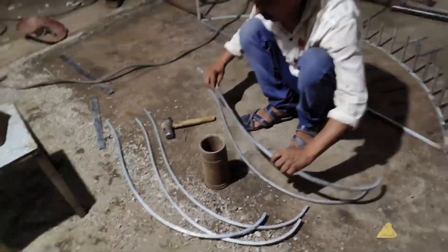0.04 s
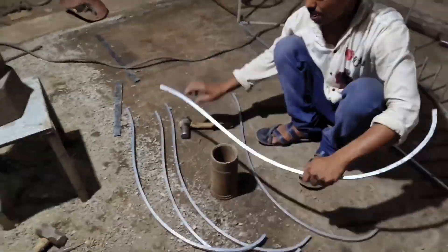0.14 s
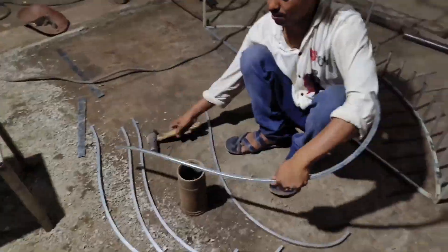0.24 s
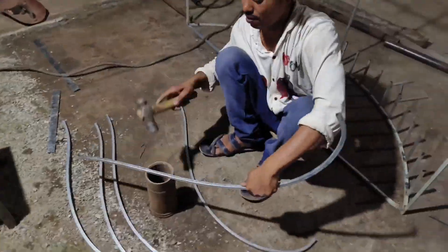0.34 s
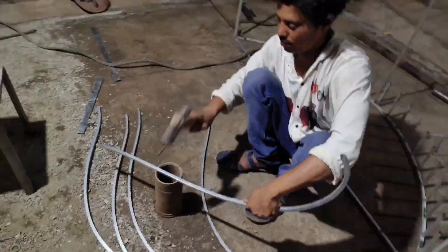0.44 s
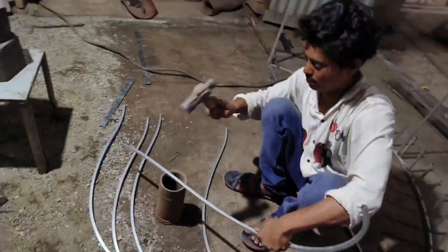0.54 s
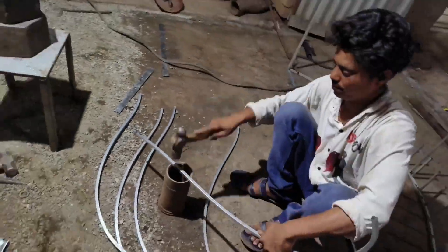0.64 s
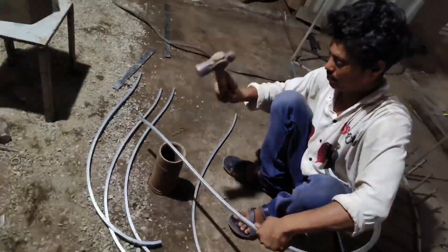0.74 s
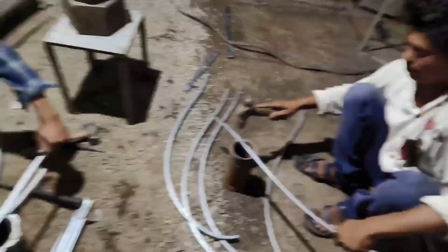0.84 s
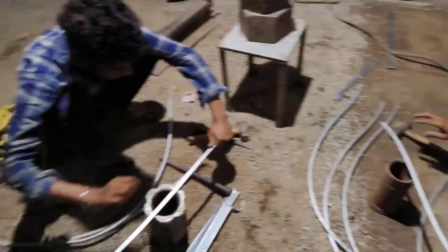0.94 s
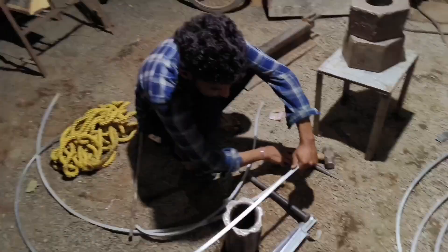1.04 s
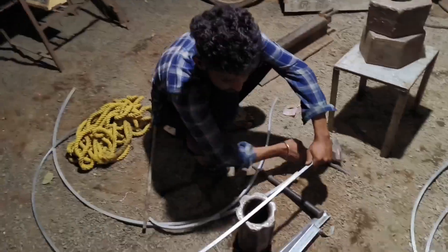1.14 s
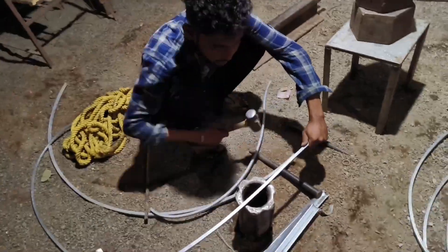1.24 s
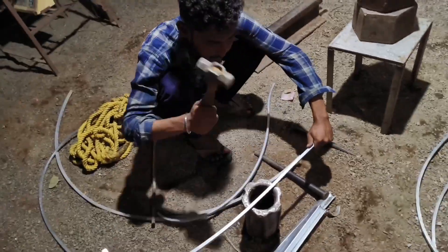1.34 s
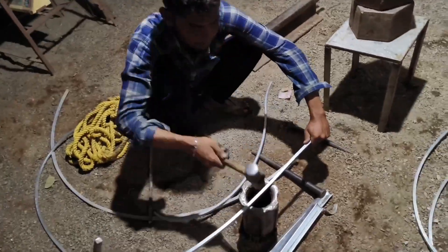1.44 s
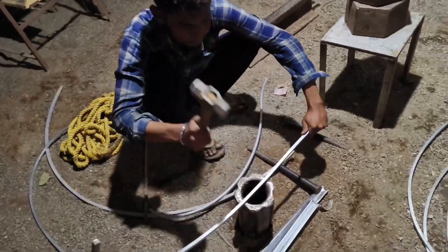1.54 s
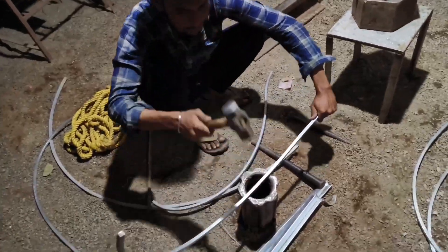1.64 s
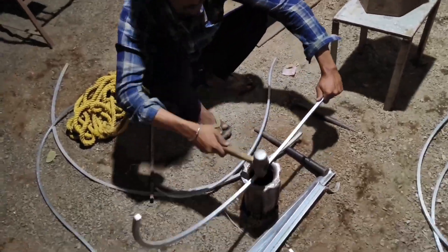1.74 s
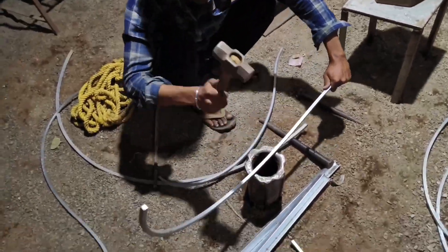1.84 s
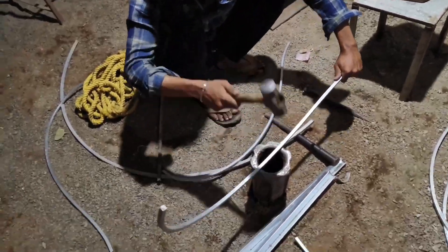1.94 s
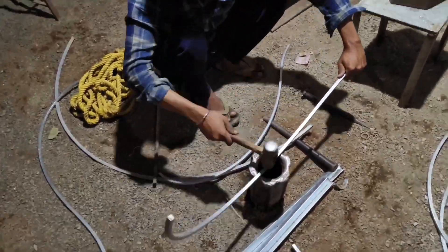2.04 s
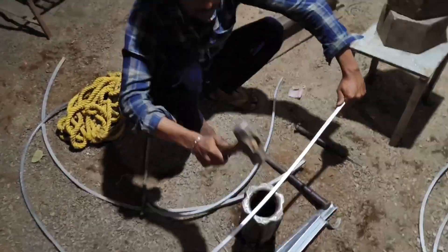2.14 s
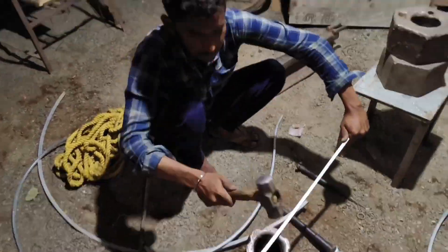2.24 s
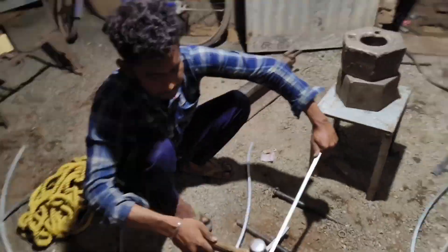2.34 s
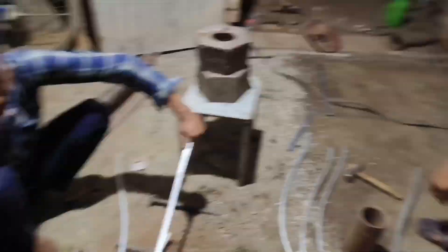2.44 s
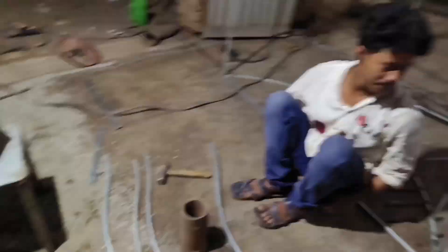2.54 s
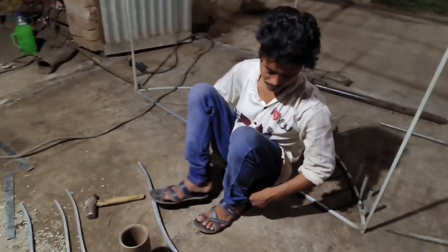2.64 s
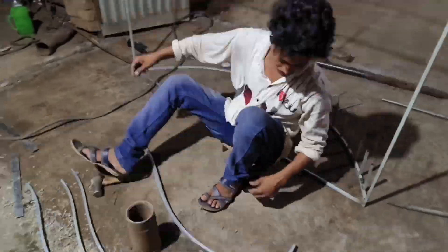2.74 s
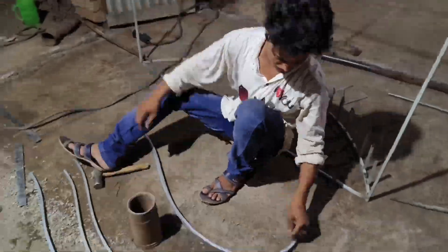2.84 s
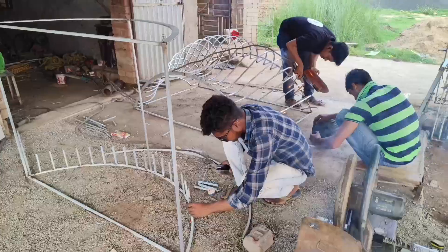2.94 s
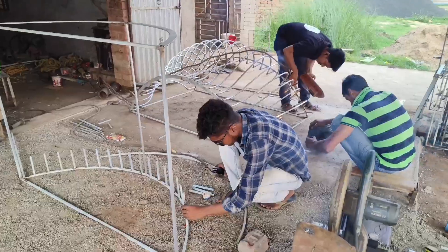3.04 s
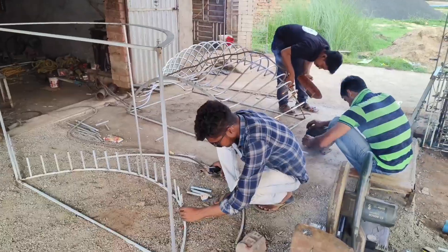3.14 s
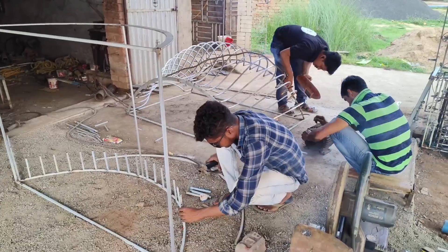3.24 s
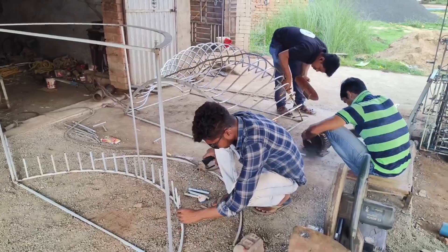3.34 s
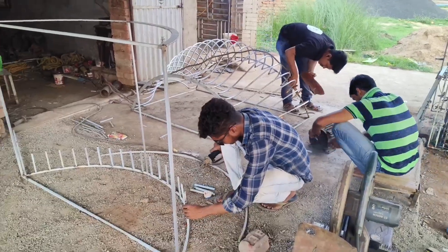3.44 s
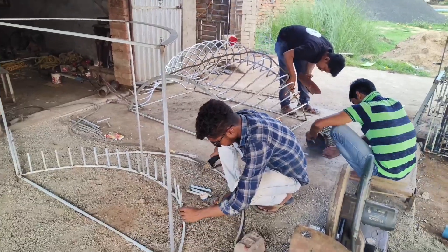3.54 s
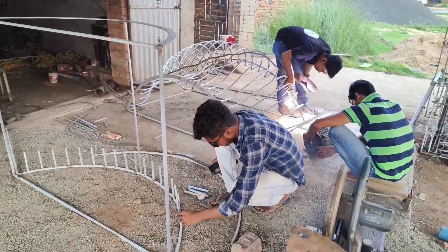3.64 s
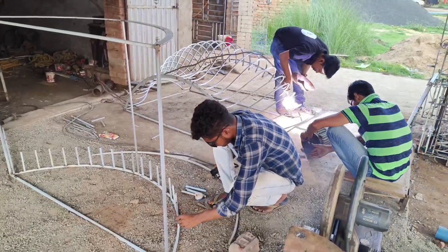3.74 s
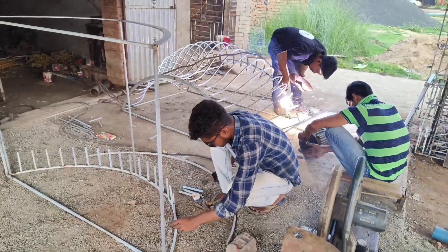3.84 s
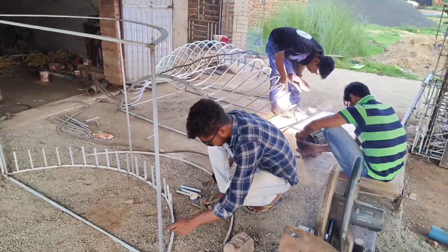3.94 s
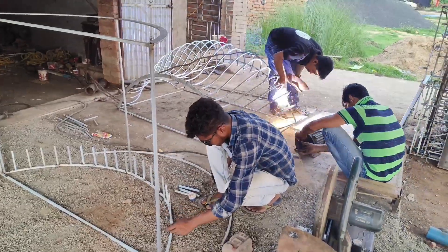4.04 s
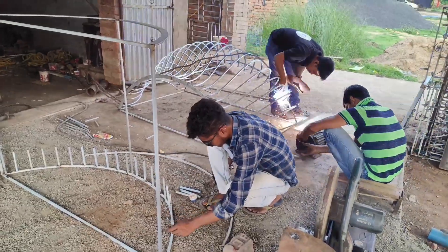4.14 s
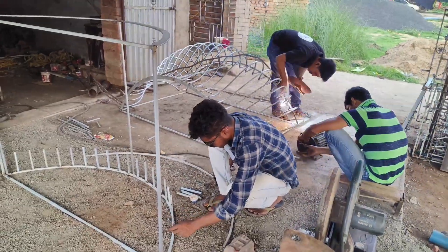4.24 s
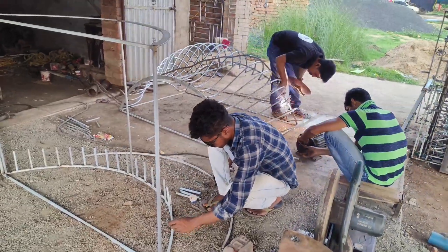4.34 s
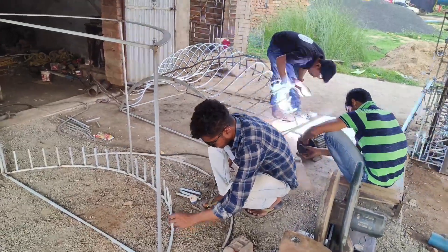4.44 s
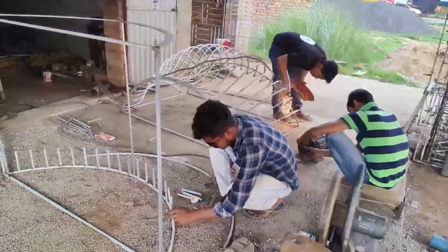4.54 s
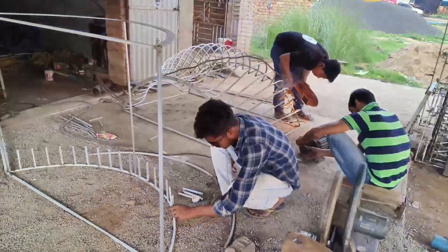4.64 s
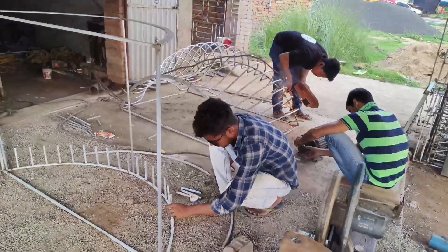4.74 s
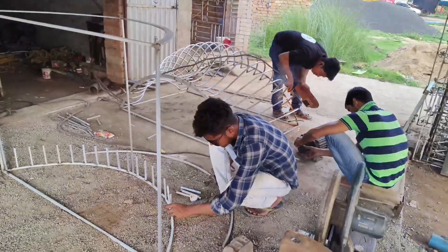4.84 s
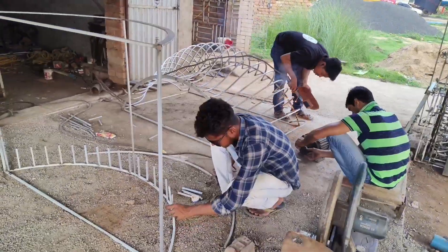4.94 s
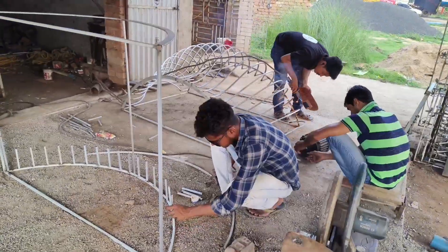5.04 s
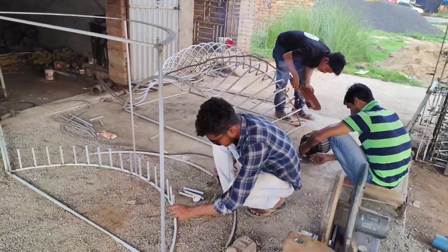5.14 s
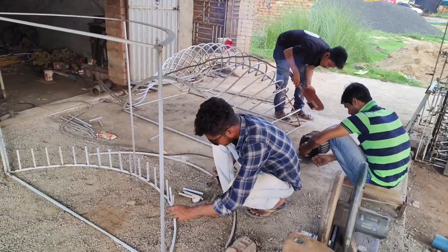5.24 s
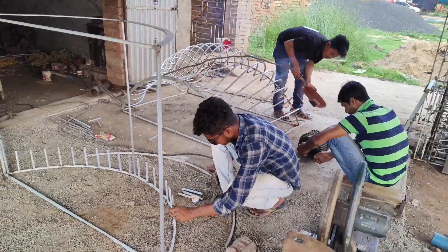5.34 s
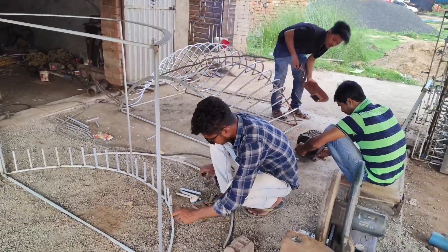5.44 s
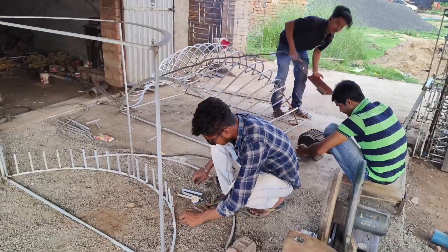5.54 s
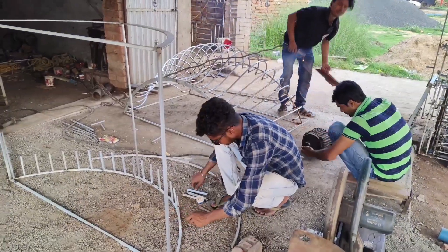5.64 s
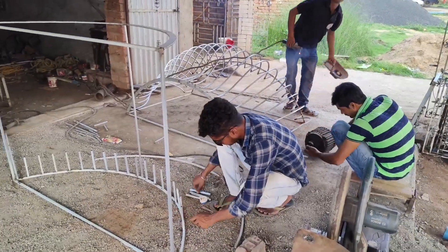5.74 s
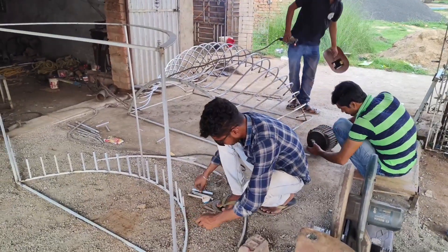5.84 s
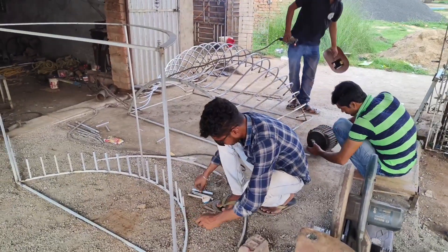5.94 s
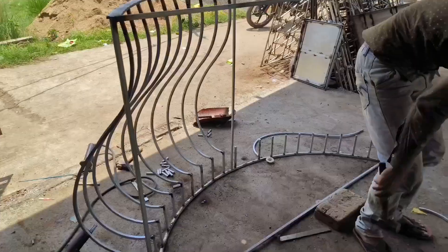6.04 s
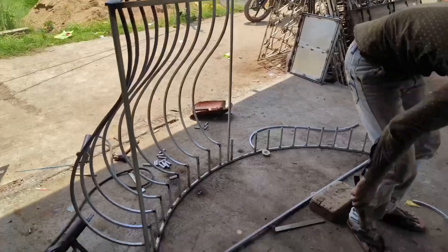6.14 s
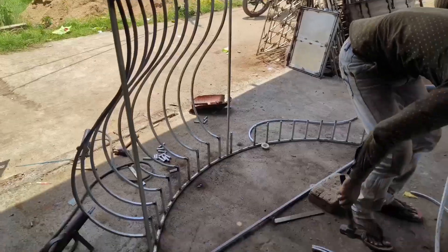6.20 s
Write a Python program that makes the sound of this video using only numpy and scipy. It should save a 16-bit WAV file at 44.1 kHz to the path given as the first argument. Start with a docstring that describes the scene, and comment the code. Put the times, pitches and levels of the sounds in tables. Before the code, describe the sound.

Fast, sharp hammering on steel rods in a metalwork yard, then a quieter machine hum with a short burst of hissing, spitting welding.

```python
"""Thin steel rods drag over gritty ground and clink, while two workers hammer them on hollow pipe anvils.
Each blow is a noise crack with a rattle; on the near anvil, pipe and rod ring in beating pairs of modes.
After a silent gap, machines drone in the metal yard and a welding arc hisses, spitting as molten drops
short it. A second gap, then a very brief last scrape."""
import sys
import numpy as np
from scipy import signal
from scipy.io import wavfile

SR = 44100
rng = np.random.default_rng(int(sys.argv[2]) if len(sys.argv) > 2 else 0)


def inscribe(sig):
    """Save sig as 16-bit PCM at rate SR to the path in sys.argv[1].

    A 1-D sig is mono; a 2-D sig holds one channel per row.
    Samples are clipped to [-1, 1] before scaling.
    """
    pcm = np.round(np.clip(np.atleast_2d(sig).T, -1, 1) * 32767)
    wavfile.write(sys.argv[1], SR, pcm.astype(np.int16))


N = 276507


def from_db(db):
    """dB to gain."""
    return 10 ** (np.asarray(db) / 20)


def rms_one(x):
    """Scale to rms 1."""
    return x / np.sqrt(np.mean(x ** 2) + 1e-20)


def sides(left_right_db):
    """Left and right gains."""
    return from_db(left_right_db / 2 * np.array([[1], [-1]]))


def padded(x, start):
    """Place a stereo sound at a start sample in the full length."""
    out = np.zeros((2, N))
    out[:, start:start + x.shape[1]] = x[:, :N - start]
    return out


def at_hz(points, hz):
    """Read a curve on a log-frequency axis."""
    points_hz, values = np.transpose(points)
    return np.interp(np.log(hz), np.log(points_hz), values)


def drift(rate_hz, size):
    """Slow random wander, rms about 1."""
    step, run_in = 40, 2000
    r = np.exp(-2 * np.pi * rate_hz * step / SR)
    white = rng.standard_normal(size // step + run_in + 2)
    slow = signal.lfilter([1], [1, -2 * r, r * r], white)[run_in:]
    return np.interp(np.arange(size) / step, np.arange(len(slow)), rms_one(slow))


def clicks(times_s, gains, size=N):
    """Train of single-sample impulses."""
    train = np.full(size, 1e-18)
    train[np.round(np.asarray(times_s) * SR).astype(int)] = gains
    return train


def random_clicks(per_s):
    """Impulses at random times, mean height 1."""
    return (rng.random(N) < per_s / SR) * rng.exponential(1, N) + 1e-18


def dying(train, t60_s, rise_s):
    """Envelope that rises at each click and decays."""
    fall, rise = from_db(-60 / (t60_s * SR)), np.exp(-1 / (rise_s * SR))
    return signal.lfilter([1 - rise], [1, -rise], signal.lfilter([1], [1, -fall], train))


def ring(train, hz, t60_s):
    """One mode: a unit click starts a decaying sine of height 1."""
    r, w = from_db(-60 / (t60_s * SR)), 2 * np.pi * hz / SR
    return signal.lfilter([0, np.sin(w)], [1, -2 * r * np.cos(w), r * r], train)


def bands(correlation, low_hz, top_hz, size):
    """Yield (centre Hz, stereo noise) in third octaves."""
    edges = 25 * 2 ** np.arange(0, 9.5, 1 / 3)
    white = rng.standard_normal((2, 2, size + SR // 10))   # adjacent bands get independent noise
    for k, (low, high) in enumerate(zip(edges, edges[1:])):
        if high > low_hz and low < top_hz:
            centre_hz = np.sqrt(low * high)
            bandpass = signal.butter(3, [low, high], "band", fs=SR, output="sos")
            mid, side = signal.sosfilt(bandpass, white[k % 2])[:, -size:]
            alike = np.clip(at_hz(correlation, centre_hz), -1, 1)
            yield centre_hz, np.sqrt(1 + alike) * mid + np.sqrt(1 - alike) * side * [[1], [-1]]


def coloured(spectrum, correlation, balance, flicker_db, flicker_hz, span):
    """Shaped noise whose bands flicker partly together; rms 1 within its span of samples."""
    size = span[1] - span[0]
    out, together = 0, drift(flicker_hz, size)
    for hz, noise in bands(correlation, spectrum[0][0], spectrum[-1][0], size):
        wander_db = flicker_db * (together + 1.62 * drift(flicker_hz, size))
        out = out + sides(at_hz(balance, hz)) * noise * from_db(at_hz(spectrum, hz) + wander_db)
    return padded(rms_one(out), span[0])


def narrow(hz, width_hz, correlation, size):
    """Stereo noise twice through one resonance; rms 1."""
    r = np.exp(-np.pi * width_hz / SR)
    mid, side = rng.standard_normal((2, size))
    x = mid + np.sqrt((1 - correlation) / (1 + correlation)) * side * [[1], [-1]]
    for _ in range(2):
        x = signal.lfilter([1, 0, -1], [1, -2 * r * np.cos(2 * np.pi * hz / SR), r * r], x)
    return rms_one(x)


# Ground noise. Each row: time in seconds, rumble in dB, grit in dB.
GROUND_LEVELS = [(0, -36.5, -40), (.15, -33.5, -41), (.5, -37, -39), (.68, -44, -43), (1, -48.5, -50),
                 (1.45, -46, -49.5), (1.7, -48.5, -52), (2.2, -54.5, -51), (2.72, -54, -53.5),
                 (2.91, -47.5, -52.5)]
# Spectra. Each row: frequency in Hz, relative density in dB.
RUMBLE_SPECTRUM = [(15, -38), (25, -9), (119, 1), (189, -4.5), (375, -4), (415, -10), (452, -14.5),
                   (626, -14), (1500, -30), (1950, -60), (3300, -120)]
SCRAPE_SPECTRUM = [(290, -31.5), (500, -1), (710, -11.5), (911, -1.5), (1370, -8), (1610, -6), (2730, -4),
                   (3880, -16), (4830, -10.5), (7170, -12), (10500, -38.5), (14000, -30.5), (16500, -58)]
# Each row: frequency in Hz, left-right correlation.
GROUND_CORRELATION = [(60, 1), (110, 0.94), (200, 0.95), (380, 0.63), (700, -0.29), (1290, -0.48),
                      (2380, 0.1), (4400, 0.19), (8120, -0.47), (15000, 0.32)]
# Each row: frequency in Hz, left over right in dB.
GROUND_BALANCE = [(60, 0.5), (180, 1.5), (550, -1), (1650, -2.5), (4970, -7.5), (15000, 1)]
# Rods and soles on grit. Each row: start in seconds, level in dB, T60 in seconds.
DRAGS = [(0.04, -33, 0.054), (0.213, -34.5, 0.22), (0.375, -28, 0.056), (0.469, -23.5, 0.19),
         (0.515, -28.5, 0.1), (.615, -52, .39), (1.127, -37, 0.21), (1.159, -41, 0.05),
         (1.211, -36.5, 0.083), (1.312, -40.5, .3), (1.391, -42, 0.95), (2.77, -50, 0.45),
         (5.741, -43, 0.18), (5.985, -43, 0.46), (6.013, -37.5, 0.043)]


def dragging():
    """Dragged rods rumble; a gritty scrape flares with each drag."""
    t = np.arange(N) / SR
    times_s, *levels_db = np.transpose(GROUND_LEVELS)
    rumble_gain, grit_gain = (from_db(np.interp(t, times_s, db, right=-140)) for db in levels_db)
    stereo = GROUND_CORRELATION, GROUND_BALANCE
    rumble = coloured(RUMBLE_SPECTRUM, *stereo, flicker_db=2, flicker_hz=4.2, span=(0, HAMMER_END))
    scrape = coloured(SCRAPE_SPECTRUM, *stereo, flicker_db=2.5, flicker_hz=13, span=(0, N))
    drags = sum(dying(clicks([s], from_db(db)), t60_s, rise_s=.0085) for s, db, t60_s in DRAGS)
    stones = dying(random_clicks(per_s=250), t60_s=.012, rise_s=.0006)   # single stones catch and slip
    return rumble_gain * rumble + (grit_gain + drags * (.8 + .35 * stones)) * scrape


# Metal clinks; the 700 Hz row is a shoe squeak. Each row: start in seconds, frequency in Hz, level in dB.
BRIEF_TONES = [(.272, 3400, -27), (.48, 950, -35), (.632, 4300, -31), (1.155, 1000, -34),
               (1.232, 2800, -22), (1.232, 4700, -34), (1.399, 5400, -35), (1.415, 1850, -35),
               (1.445, 2650, -42), (1.61, 1800, -42), (2.812, 700, -45), (3.82, 4200, -38)]


def clinks_and_squeak():
    """Brief narrow-band tones, shorter when higher: metal clinks and the squeak of a scuffing shoe."""
    out, size = 0, SR // 4
    for start_s, hz, db in BRIEF_TONES:
        envelope = dying(clicks([0], from_db(db), size), t60_s=.1 * (1000 / hz) ** .6, rise_s=.003)
        band = narrow(hz, width_hz=hz / 16, correlation=.2, size=size)
        out = out + padded(band * envelope, round(start_s * SR))
    return out


# Rods knocked and dropped. Each row: start in seconds, then in dB: level, left over right,
# thud, knock and treble offsets.
ROD_KNOCKS = [(.273, -4.5, -0.5, -9.5, -13, -14.5), (0.3157, -12, -1, -5, -10.5, -22.5),
              (.33, -21, 1, -1, -6, -27.5), (1.0057, -49.5, -6, 26.5, 17, -8),
              (1.038, -34, 1, -11, 5.5, -26.5), (1.315, -35.5, 4, -2, 8, -14),
              (1.3977, -31.5, -4, -12, -9, -2)]
# Far anvil. Each row: start in seconds, then in dB: level, left over right, thud and treble offsets.
FAR_BLOWS = [(0.5618, -10.5, -7, -1.5, -1), (0.7244, -10, -5, -0.5, -2), (.8888, -6.5, -3, -8, -1)]
# Near anvil. Each row: as the far anvil, then ring levels in dB: hollow, pipe, low rod, high rod.
NEAR_BLOWS = [(1.5175, -7.5, -2.5, -5.5, -3, -21, -33, -27, -25.5),
              (1.6817, -7.5, 4, -7, -1, -25.5, -27.5, -27.5, -24.5),
              (1.8387, -7.5, -0.5, -2.5, 0, -10.5, -37.5, -33, -28.5),
              (1.9922, -6.5, -3, -2.5, -2.5, -32, -33, -15.5, -30),
              (2.1402, -8.5, -3, -8.5, 2, -19, -34.5, -30.5, -26.5),
              (2.2771, -8.5, 0.5, -1.5, -1, -31, -27, -33, -14),
              (2.4086, -10, -4, -1.5, -2, -9.5, -29, -34.5, -26),
              (2.5359, -12, -4.5, -5.5, 7, -23.5, -30.5, -34.5, -19.5),
              (2.6344, -12.5, -1.5, -9.5, 0.5, -34, -32.5, -29.5, -23)]


def all_blows():
    """Knocks and hammer blows in time order, as the columns of ROD_KNOCKS."""
    hammer = [(*row[:4], 0, row[4]) for row in FAR_BLOWS + NEAR_BLOWS]
    return np.transpose(sorted(list(map(tuple, ROD_KNOCKS)) + hammer))


# Each row: frequency in Hz, relative density in dB.
CRACK_SPECTRUM = [(35, -16.5), (60, -10.5), (240, -2.5), (534, -2), (2090, -8.5), (2400, -10.5), (3420, -9),
                  (3750, -15.5), (4430, -8), (6760, -7.5), (10600, -17), (14700, -11), (16500, -28)]
# Each row: frequency in Hz, T60 in seconds.
CRACK_DECAY = [(80, 0.083), (500, 0.023), (3000, 0.036), (15000, 0.045)]
# Each row: frequency in Hz, rattle relative to crack in dB.
RATTLE_LEVELS = [(80, -20), (500, -24), (1500, -23), (4000, -17), (8000, -22), (10500, -30), (15000, -28)]
# Each row: frequency in Hz, left-right correlation.
CRACK_CORRELATION = [(60, 0.55), (110, 0.59), (200, 0.46), (380, 0.03), (700, -0.49), (1290, -0.25),
                     (2380, -0.0), (4400, 0.06), (8120, -0.14), (15000, 0.07)]
# Each row: frequency in Hz, left over right in dB.
CRACK_BALANCE = [(60, 7), (130, 0.5), (290, 3), (640, 5.5), (1410, 1.5), (3100, 5.5), (6820, -3),
                 (15000, 4.5)]
CRACK_GAIN_DB, CUTOFF_HZ = 4.5, 16700


def cracks():
    """Each impact is a noise burst: a short crack and a longer rattle, longest in the bass."""
    starts_s, level_db, pan_db, thud_db, knock_db, treble_db = all_blows()
    offsets_db, crossovers_hz = [thud_db, knock_db, 0, treble_db], [600, 2500, 9000]
    out = 0
    for hz, noise in bands(CRACK_CORRELATION, 60, CUTOFF_HZ, HAMMER_END):
        colour_db = offsets_db[np.searchsorted(crossovers_hz, hz)] + at_hz(CRACK_SPECTRUM, hz)
        train = clicks(starts_s, from_db(level_db + colour_db + CRACK_GAIN_DB), HAMMER_END)
        t60_s = at_hz(CRACK_DECAY, hz)
        crack = dying(train, t60_s, rise_s=.00051)
        rattle = from_db(at_hz(RATTLE_LEVELS, hz)) * dying(train, 3.1 * t60_s, rise_s=.0067)
        out = out + noise * (crack + rattle) * sides(at_hz(CRACK_BALANCE, hz))
    latest_blow = np.clip(np.searchsorted(starts_s, np.arange(HAMMER_END) / SR) - 1, 0, None)
    return out * sides(pan_db[latest_blow])


# Each row: frequency in Hz, level relative to the blow in dB, T60 in seconds.
FAINT_MODES = [(3262, -30, .045), (4748, -28, .06), (5986, -28, .05), (7354, -30, .045), (9184, -30, .045),
               (10630, -32, .04), (13280, -34, .04), (14110, -34, .045), (14800, -30, .045)]


def faint_rings():
    """Every impact wakes faint modes, with random strength and sign per mode and ear."""
    starts_s, blow_db = all_blows()[:2]
    out = np.zeros((2, HAMMER_END))
    for hz, mode_db, t60_s in FAINT_MODES:
        chance = rng.normal(0, 1, (len(starts_s), 2, 2))
        for side in range(2):
            scatter_db, sign = 3 * chance[:, side, 0], np.sign(chance[:, side, 1])
            gains = sign * from_db(blow_db + mode_db + scatter_db)
            out[side] += ring(clicks(starts_s, gains, HAMMER_END), hz, t60_s)
    return out


# Near anvil, rod and hammer head. Each row: frequency in Hz, T60 in seconds, left over right in dB,
# twin offset in Hz.
STRONG_MODES = [(370, .032, 5, 60), (2390, .21, -6, 14), (3835, .14, -3, 40), (4015, .075, -2, 30),
                (5285, .055, -8, 45), (6720, .048, -9, 60), (11580, .27, 4, 45)]
ROD_UPPER_OFFSET_DB, CLANK_DB, HEAD_DB = -2, -19, -44


def strong_rings():
    """Close pairs of modes beat; each near blow stops the last ring and starts a new one."""
    starts_s, *_, hollow_db, pipe_db, low_rod_db, high_rod_db = np.transpose(NEAR_BLOWS)
    levels_db = np.broadcast_arrays(hollow_db, pipe_db, low_rod_db, low_rod_db + ROD_UPPER_OFFSET_DB,
                                    high_rod_db, CLANK_DB, HEAD_DB)
    start = round(starts_s[0] * SR)
    t = np.arange(start, HAMMER_END) / SR
    latest_blow = np.clip(np.searchsorted(starts_s, t) - 1, 0, None)
    age_s = np.clip(t - starts_s[latest_blow], 0, None)
    out = 0
    for (hz, t60_s, pan_db, split_hz), level_db in zip(STRONG_MODES, levels_db):
        phase = rng.uniform(0, 2 * np.pi, (len(starts_s), 2, 2))[latest_blow].T
        mode = np.sin(2 * np.pi * hz * age_s + phase[0])
        twin = .45 * np.sin(2 * np.pi * (hz + split_hz) * age_s + phase[1])
        waver_db = 3.5 * drift(rate_hz=50, size=len(t))   # the held rod chatters
        envelope = from_db(level_db[latest_blow] - 60 * age_s / t60_s + waver_db)
        out = out + (mode + twin) * envelope * sides(pan_db)
    attack = 1 - np.exp(-age_s / .0015)
    return padded(out * attack, start)


# Each row: start in seconds, level in dB, upper edge in Hz, T60 in seconds.
BUMPS = [(2.805, -46, 1200, 0.22), (2.847, -39.5, 597, 0.084), (3.831, -39, 1810, 0.46),
         (4.69, -32, 280, 0.067)]


def bumps():
    """Dull mono bursts: a foot scuffs, the arc strikes and breaks."""
    out = 0
    for start_s, db, top_hz, t60_s in BUMPS:
        bandpass = signal.butter(2, [70, top_hz], "band", fs=SR, output="sos")
        dull = rms_one(signal.sosfilt(bandpass, rng.standard_normal(N)))
        out = out + dull * dying(clicks([start_s], from_db(db)), t60_s, rise_s=.013)
    return out


# Each row: time in seconds, level in dB.
DRONE_LEVELS = [(3.22, -46.5), (3.46, -39.5), (3.88, -40.5), (4.0, -46), (4.6, -46.5), (5.2, -48.5),
                (5.36, -42), (5.55, -45), (5.8, -39.5), (6.06, -43)]
# Each row: frequency in Hz, width in Hz, full level in dB, its start and end in seconds.
WHINES = [(266.1, 10.7, -57.5, 3.6, 6.1), (531.2, 16.4, -62, 2.8, 6.1), (1032, 89, -57.5, 3.74, 7.2),
          (2660, 15, -60, 4.93, 5.65)]
# Each row: frequency in Hz, relative density in dB.
WASH_SPECTRUM = [(82, -41), (140, -10.5), (226, -9.5), (260, -4), (305, -13), (523, -16.5), (566, -15.5),
                 (1050, -10), (1570, -16.5), (2580, -17.5), (3840, -28), (7140, -32), (11500, -57.5),
                 (14600, -50), (16500, -70)]
# Wash and arc. Each row: frequency in Hz, left-right correlation.
YARD_CORRELATION = [(60, 0.95), (110, 0.088), (200, 1), (380, 0.56), (700, -0.031), (1290, -0.7),
                    (2380, 0.15), (4400, 0.035), (8120, 0.042), (15000, -0.052)]
# Wash and arc. Each row: frequency in Hz, left over right in dB.
YARD_BALANCE = [(60, -3), (180, 1.5), (550, 3), (1650, -2.0), (4970, -5.5), (15000, 0.5)]
WASH_DB = -49


def machines():
    """Machines give a wavering low drone, faint whines and a broad wash."""
    start, end = (round(s * SR) for s in AUDIBLE_SPANS[1][:2])
    t = np.arange(start, end) / SR
    wash = coloured(WASH_SPECTRUM, YARD_CORRELATION, YARD_BALANCE,
                    flicker_db=.07, flicker_hz=4.7, span=(start, end))
    whines = 0
    for hz, width_hz, db, from_s, until_s in WHINES:
        dip_db = np.clip(60 * np.minimum(t - from_s, until_s - t), -12, 0)
        correlation = np.clip(at_hz(YARD_CORRELATION, hz), -.9, .9)
        whines = whines + from_db(db + dip_db) * narrow(hz, width_hz, correlation, len(t))
    drone_db = np.interp(t, *np.transpose(DRONE_LEVELS))
    drone = from_db(drone_db) * narrow(hz=77, width_hz=38.6, correlation=.97, size=len(t))
    return padded(drone + whines, start) + from_db(WASH_DB) * wash


# Each row: frequency in Hz, relative density in dB.
ARC_SPECTRUM = [(710, -66), (1200, 0.5), (1540, -19.5), (1670, -3.5), (2150, -14), (2560, -7), (3520, -6),
                (4470, -3.5), (6940, 0.5), (9330, -10.5), (14800, -5), (16000, -14), (16500, -63)]
# Each row: start in seconds, level in dB.
SPITS = [(3.826, -43), (3.8348, -29.5), (3.9428, -37), (3.9824, -49), (4.0165, -33), (4.1124, -37),
         (4.1644, -31.5), (4.315, -44), (4.355, -30), (4.4363, -29.5), (4.499, -32.5), (4.5247, -32),
         (4.556, -26), (4.585, -36), (4.607, -28)]
ARC_ON_S, ARC_OFF_S, ARC_RISE_S, ARC_FALL_DB_PER_S = 3.812, 4.64, .0086, 202
HISS_DB, SPUTTER_DB, FLARE_OFFSET_DB, SPIT_T60_S = -41.5, -53.5, -10.5, .03
LAST_SCRAPE_S, LAST_SCRAPE_DB = 6.25, -41


def arc_and_last_scrape():
    """The arc hisses, spits and flares as molten drops short it; the last scrape shares its noise."""
    t = np.arange(N) / SR
    strike = np.clip((t - ARC_ON_S) / ARC_RISE_S, 0, 1)
    burning = strike * from_db(-ARC_FALL_DB_PER_S * np.clip(t - ARC_OFF_S, 0, None))
    small_drops = from_db(SPUTTER_DB) * random_clicks(per_s=90)
    hiss = burning * (from_db(HISS_DB) + dying(small_drops, SPIT_T60_S, rise_s=.0003))
    starts_s, spit_db = np.transpose(SPITS)
    big_drops = clicks(starts_s, from_db(spit_db))
    spits = dying(big_drops, SPIT_T60_S, rise_s=.00034)
    flares = from_db(FLARE_OFFSET_DB) * dying(big_drops, t60_s=.23, rise_s=.006)
    scrape = from_db(LAST_SCRAPE_DB) * (t > LAST_SCRAPE_S)
    noise = coloured(ARC_SPECTRUM, YARD_CORRELATION, YARD_BALANCE,
                     flicker_db=1.08, flicker_hz=24, span=(round(ARC_ON_S * SR), N))
    return (hiss + spits + flares + scrape) * noise


# Hammering, welding, last scrape. Each row: start, end and fade-in, all in seconds.
AUDIBLE_SPANS = [(0, 2.906, .001), (3.222, 6.055, .04), (6.254, 6.28, .014)]
HAMMER_END = round(AUDIBLE_SPANS[0][1] * SR)


def scene():
    """All sources, gated to silence between the spans."""
    t = np.arange(N) / SR
    gate = sum(np.clip((t - start_s) / fade_s, 0, 1) ** 2 * (t < end_s)
               for start_s, end_s, fade_s in AUDIBLE_SPANS)
    hammering = padded(cracks() + faint_rings(), 0) + strong_rings()
    return gate * (hammering + clinks_and_squeak() + dragging()
                   + machines() + arc_and_last_scrape() + bumps())


PORT_HZ, PORT_WIDTH_HZ, PORT_GAIN = 7076, 480, .91


def record(dry):
    """Microphone port resonance lifts one treble band; soft clipping and a low-pass follow."""
    r, w = np.exp(-np.pi * PORT_WIDTH_HZ / SR), 2 * np.pi * PORT_HZ / SR
    resonance = (1 - r * r) / 2 * signal.lfilter([1, 0, -1], [1, -2 * r * np.cos(w), r * r], dry)
    rounded = 1.3 * np.tanh((dry + PORT_GAIN * resonance) / 1.3)
    return signal.sosfilt(signal.cheby2(12, 70, CUTOFF_HZ, fs=SR, output="sos"), rounded)


dry = scene()
out = record(dry)
inscribe(out)
```